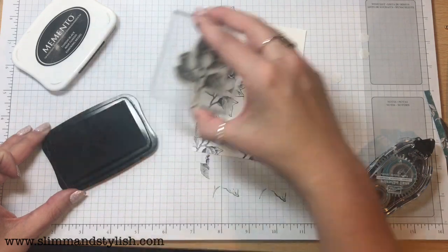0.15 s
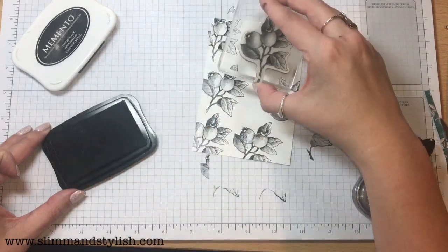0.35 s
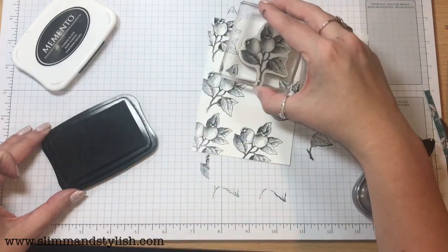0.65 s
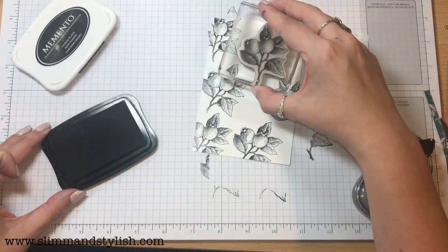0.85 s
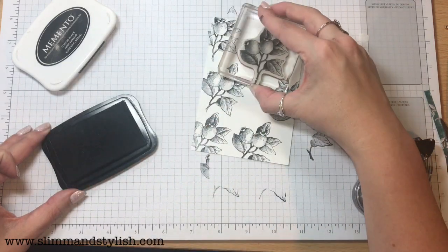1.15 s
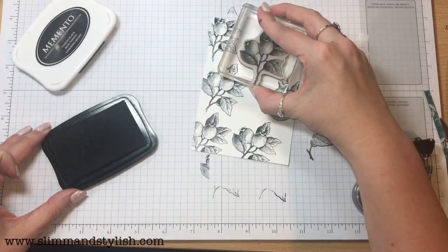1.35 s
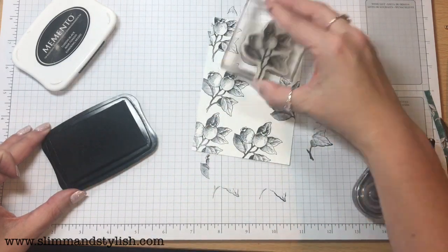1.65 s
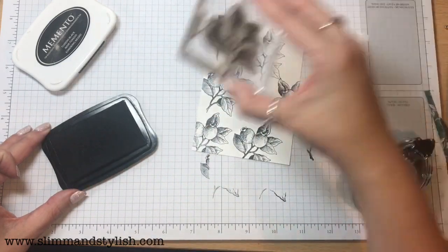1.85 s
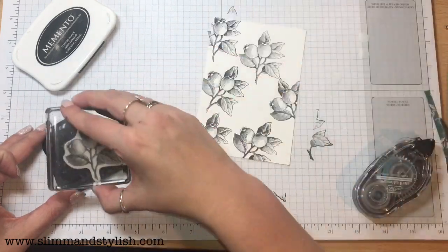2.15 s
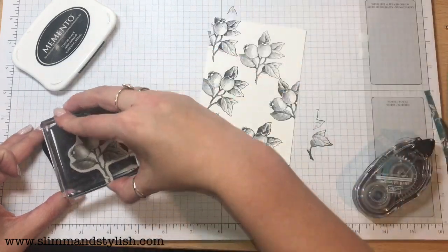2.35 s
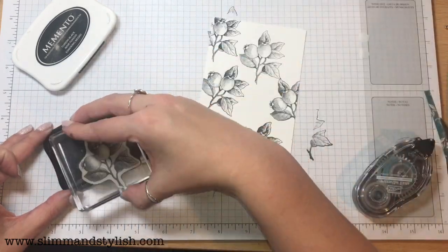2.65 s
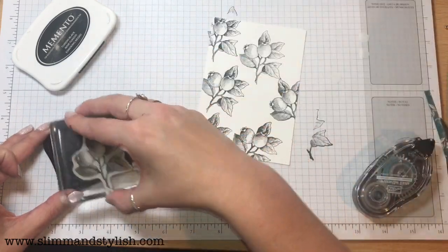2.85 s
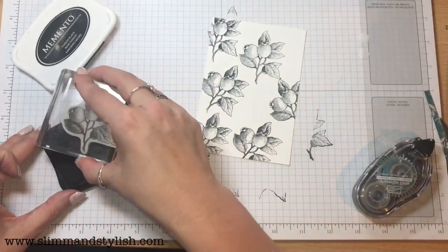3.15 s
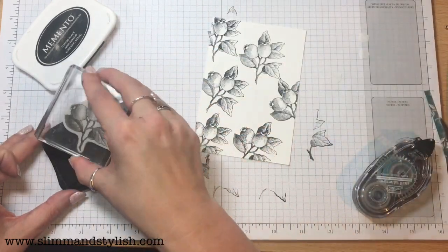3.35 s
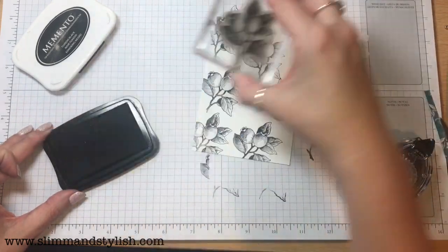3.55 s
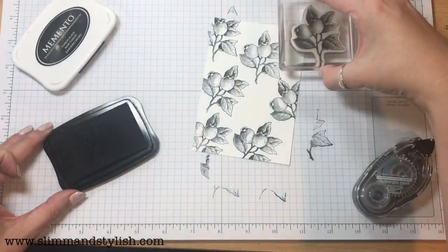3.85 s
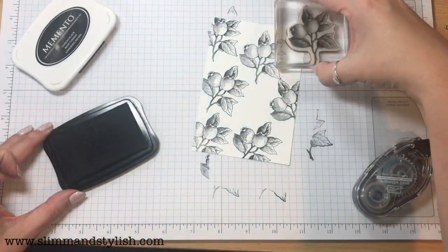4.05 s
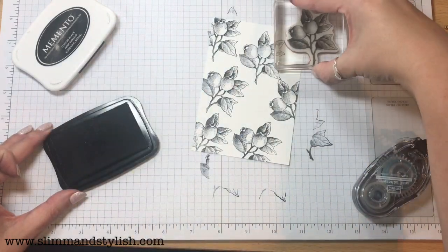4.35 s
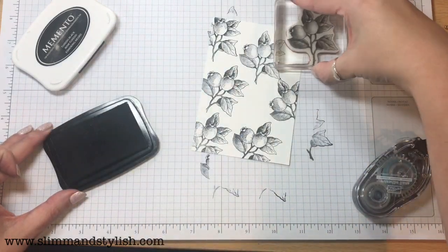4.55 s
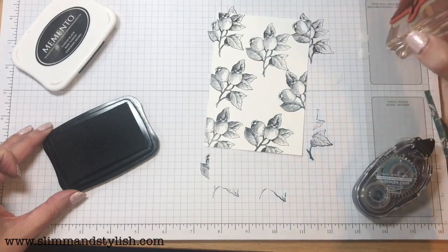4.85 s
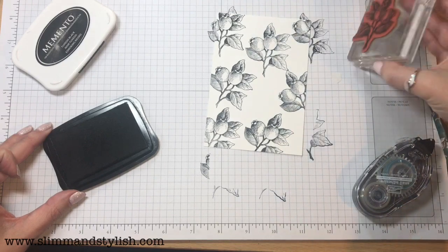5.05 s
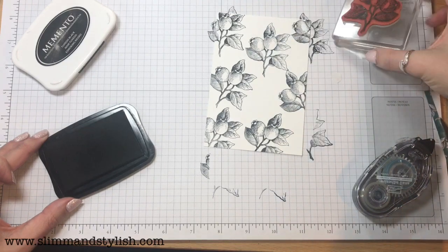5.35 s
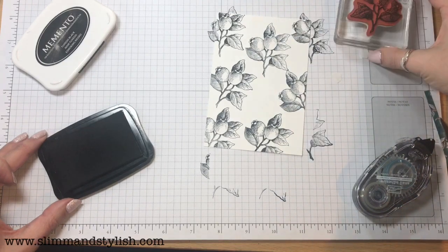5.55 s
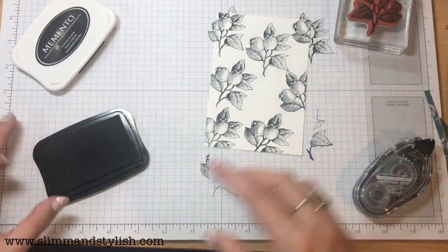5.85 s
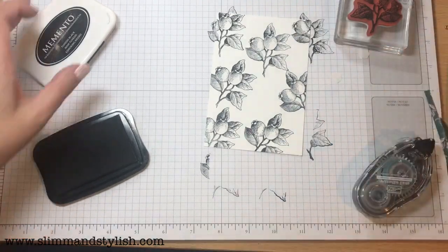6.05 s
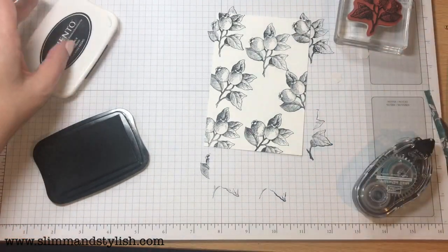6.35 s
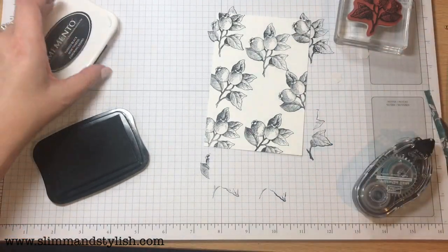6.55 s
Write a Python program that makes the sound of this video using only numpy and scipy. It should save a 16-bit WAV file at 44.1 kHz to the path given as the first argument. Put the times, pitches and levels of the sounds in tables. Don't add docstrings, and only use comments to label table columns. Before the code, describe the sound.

In a quiet room, dull tabletop thuds and tiny rubbery clicks alternate with sleeve rustle, ending in a brief hissing scrape and hollow plastic knocks.

```python
import sys
import numpy as np
from scipy import signal
from scipy.fft import rfft, irfft, next_fast_len
from scipy.io import wavfile

SR = 44100
rng = np.random.default_rng(int(sys.argv[2]) if len(sys.argv) > 2 else 0)


def rack_gain(trim_db):
    fader = np.asarray(trim_db, float)
    return 10 ** (fader / 20)


def wav_record(signal):
    frames = np.transpose(np.atleast_2d(signal))
    bounded = np.clip(frames, -1, 1)
    quanta = np.round(bounded * 32767).astype(np.int16)
    wavfile.write(sys.argv[1], SR, quanta)


N = 295558

# [frequency_hz, density_db_per_hz]
FLOOR_SPECTRUM = [(15, -57), (25, -5), (53, 0), (76, -4), (150, -9), (176, -11.5), (329, -15.5),
                  (367, -18.5), (551, -19), (805, -22.5), (4820, -31.5), (9240, -33), (10400, -35.5),
                  (12300, -32.5), (15800, -33.5), (16300, -40)]
# [frequency_hz, width_hz, removed_share]
PORT_DIPS = [(4900, 200, .3), (7750, 400, .25), (10450, 600, .3), (13400, 500, .15)]
# [pitch_hz, level_db_rms]
WHINES = [(6988, -99), (8985, -96), (12575, -98)]

# [start_s, length_s, level_db, brightness_hz]
CLOTH_MOVES = [(1.87, .35, -68.5, 1350), (2.2, .28, -70, 1400), (2.62, .36, -76.5, 1600),
               (3.18, .33, -66.5, 2200), (4.3, .2, -76, 2300), (4.4, .26, -72, 2500),
               (4.65, .45, -73.5, 2400), (5.02, .3, -67, 2200), (5.15, .36, -65, 2380),
               (5.45, .17, -76, 1900), (5.77, .2, -76, 1500), (5.87, .36, -68, 2100), (6.15, .4, -73, 1700),
               (6.4, .5, -73, 1500)]
# [brightness_share, density_db_per_hz]
CLOTH_SPECTRUM = [(.1, -10), (.3, -2), (.6, -6.5), (.85, -1.5), (1.15, -6.5), (1.45, -13), (1.9, -20),
                  (4, -22)]
# [frequency_hz, width_hz, level_db]
CLOTH_FOLDS = [(1250, 60, -13), (1600, 70, -19), (2120, 50, -13)]
# [start_s, length_s, first_hz, last_hz, level_db]
RUBS = [(2.28, .05, 1500, 1500, -72), (2.34, .05, 1600, 1250, -68), (2.37, .03, 5500, 5400, -68),
        (2.375, .025, 7000, 7100, -64), (2.37, .04, 8500, 8500, -68), (2.03, .12, 330, 300, -68),
        (5.55, .14, 5450, 5500, -71), (4.73, .065, 1700, 2750, -73), (4.78, .15, 1220, 1230, -79),
        (4.8, .05, 1850, 1900, -78), (4.87, .1, 2150, 2050, -77), (5.18, .08, 1200, 1240, -74),
        (5.3, .13, 1250, 1200, -74), (5.33, .08, 2980, 2950, -76)]

# [start_s, length_s, level_db]
GLIDES = [
    (5.03, .33, -66.5),
    (5.45, .27, -58.5),
]
# [start_s, length_s, level_db]
DRAGS = [
    (5.06, .2, -66),
    (5.2, .17, -59.5),
    (5.31, .12, -65),
    (5.4, .11, -67),
    (5.59, .12, -70),
    (5.84, .18, -72),
]
# [frequency_hz, density_db_per_hz]
GLIDE_SPECTRUM = [(1760, -50), (3000, -23), (3830, -20), (4440, -9), (4800, -15), (5440, -9), (6400, -10),
                  (7560, -4.5), (8400, -9), (10800, -11), (14900, -14), (16000, -30)]
# [frequency_hz, density_db_per_hz]
DRAG_SPECTRUM = [(1470, -11.5), (2500, -13), (4050, -9), (5560, -8.5), (7590, -12), (8460, -14),
                 (16000, -9.5)]
# [frequency_hz, width_hz, level_db]
AIR_GAP = [(5400, 300, -1), (6500, 300, -14), (8400, 380, 6), (9850, 350, 4.5), (13000, 500, -18),
           (14600, 400, -8)]

# [start_s, peak_db, rise_s, hold_s]
LID_SCRAPES = [(6.088, -56, .022, .008), (6.126, -59.5, .018, .003), (6.146, -42, .00091, .0054),
               (6.155, -39, .007, .017), (6.182, -56.5, .0058, .032), (6.217, -51, .0016, .0048),
               (6.224, -49.5, .0066, .018), (6.265, -61.5, .0094, .015), (6.479, -61.5, .003, .011),
               (6.492, -58, .002, .0079), (6.501, -51.5, .012, .015)]
# [frequency_hz, width_hz, level_db]
LID_SHELL = [(850, 97, 9), (1240, 51, 12.5), (1433, 31, 4), (1952, 58, 13), (2200, 46, 0), (2800, 60, 2),
             (3430, 70, 5), (3670, 55, -6), (4530, 74, 2), (5260, 69, 4.5)]
# [frequency_hz, density_db_per_hz]
SCRAPE_SPECTRUM = [(300, -33), (600, -30), (1230, 0), (1900, -1.5), (2650, -2.5), (4600, -5.5),
                   (8000, -12.5), (11000, -18.5), (15500, -13.5)]
# [start_s, level_db]
LID_THUDS = [
    (6.146, -50),
    (6.19, -61),
    (6.217, -41),
    (6.232, -61),
    (6.481, -50),
    (6.492, -61),
]
# [start_s, level_db]
LID_CATCHES = [(6.148, -39), (6.161, -38), (6.166, -39), (6.173, -37), (6.1765, -36), (6.179, -38),
               (6.219, -43), (6.237, -51), (6.245, -49.5), (6.491, -53), (6.517, -49.5)]

# [start_s, peak_db, brightness_hz, t60_s]
SNAPS = [(1.5536, -62.5, 4200, .12), (1.5806, -56, 4300, .12), (1.6, -43, 2920, .015),
         (2.323, -60, 1180, .084), (2.5528, -59, 5300, .059), (2.7318, -67, 3800, .027),
         (2.7643, -61, 4200, .04), (2.7925, -58, 9000, .073), (2.9608, -62, 3000, .025),
         (3.2218, -65, 8000, .02), (3.271, -64, 5060, .13), (3.2962, -52, 11000, .02),
         (3.4206, -60, 2200, .035), (4.4688, -64, 5300, .077), (4.4889, -64, 4300, .1),
         (4.6513, -54, 4500, .024), (5.7149, -63, 12500, .024), (5.7233, -63, 12000, .025),
         (5.7233, -66, 4500, .03), (6.148, -42, 9000, .011), (6.217, -62, 7000, .019),
         (6.4824, -58, 4500, .032), (6.4924, -53, 8000, .081)]
# [start_s, peak_db, brightness_hz, t60_s]
CRACKLES = [(1.004, -58, 4000, .1), (1.004, -56, 1600, .1), (1.589, -46.5, 3100, .055),
            (1.593, -54, 6000, .06), (1.633, -68, 3000, .05), (2.038, -69, 5500, .05),
            (2.569, -63, 5500, .04), (2.856, -65, 2400, .1), (2.88, -60.5, 2400, .09),
            (2.899, -63.5, 2740, .042), (2.988, -64.5, 2700, .043), (3.005, -78, 13000, .12),
            (3.298, -57, 5700, .12), (4.033, -58, 2200, .026), (4.552, -53, 3500, .05),
            (5.03, -44, 4800, .08), (5.043, -39.5, 2720, .057), (5.075, -56, 5000, .067),
            (6.175, -36, 4530, .042)]
# [start_s, peak_db, brightness_hz, t60_s]
SLAPS = [(1.59, -53, 1140, .04), (1.601, -52, 1200, .05), (2.345, -63, 1400, .12), (2.552, -54, 1050, .044),
         (4.024, -53.5, 1500, .069), (4.027, -50, 960, .09), (4.044, -63, 1190, .1), (5.036, -50, 880, .12),
         (5.037, -52, 1500, .06), (5.044, -39, 1380, .065), (5.25, -54, 1000, .07), (5.721, -62, 900, .074)]
# [start_s, peak_db, brightness_hz, t60_s]
PEELS = [
    (2.33, -60, 5000, .22),
    (2.35, -68, 12000, .15),
    (4.51, -60, 7650, .1),
    (4.845, -72, 13000, .06),
]
# [rows, rise_s, crisp_db at 4 kHz]
CONTACT_KINDS = [
    (SNAPS, .0008, -5),
    (CRACKLES, .0033, -7),
    (SLAPS, .0035, -17),
    (PEELS, .035, -10),
]
# [start_s, peak_db, pitch_hz]
FIBRE_TICKS = [(1.5612, -56, 3400), (1.5676, -58, 3500), (1.5729, -56, 3300), (1.585, -50, 3600),
               (1.5864, -50, 4200), (1.591, -45, 2800), (1.5933, -35, 3200), (1.6, -40, 5500),
               (1.6346, -55, 3500), (2.7891, -52, 3800), (2.7945, -48, 4000), (2.8593, -56, 2800),
               (2.8627, -52, 2100), (2.8746, -56, 1900), (2.8825, -55, 2600), (2.8874, -51, 2500),
               (2.904, -53, 3000), (2.9252, -61, 2900), (2.9899, -57, 3000), (3.2879, -52, 6300),
               (3.3064, -44, 5500), (4.0237, -49, 3000), (4.0369, -43, 1800), (4.5016, -57, 3900),
               (4.552, -49, 3900), (4.5573, -42, 7100), (5.0337, -36, 3600), (5.0452, -33, 2800),
               (5.0478, -31, 1400), (6.0965, -54, 1900), (6.148, -30, 2900), (6.2016, -41, 2500),
               (6.4924, -40, 3500)]
# [start_s, level_db]
LANDINGS = [
    (1.005, -49),
    (1.016, -53),
    (2.555, -67),
    (4.03, -56),
    (4.556, -68),
    (4.649, -69),
    (5.047, -46),
]
# [frequency_hz, level_db, t60_s]
BLOCK_MODES = [(1000, 4, .032), (2280, -3, .025), (3450, 0, .025), (4100, -6, .02), (4650, -9, .02)]

# [frequency_hz, level_db, t60_s]
CARD_FLAP = [(220, -41, .1), (903, -58, .06), (1030, -50, .07), (1315, -51, .05)]
BLOCK_ROCK = [(122, -22, .2), (185, -34, .15), (316, -36, .14), (345, -40, .12), (415, -48, .1)]
LID_DROP = [(345, -34, .2), (566, -32, .07), (819, -52, .05)]
STAMP_SEAT = [(145, -36, .28), (312, -48, .2), (554, -54, .15)]
# [start_s, modes]
OWN_RINGS = [
    (1.599, CARD_FLAP),
    (5.0508, BLOCK_ROCK),
    (6.2192, LID_DROP),
    (4.042, STAMP_SEAT),
]

# [frequency_hz, level_db, t60_s]
SWAY_MODES = [(45.6, -6, 0.57), (72, -0.5, 0.38)]
# [frequency_hz, level_db, t60_s]
TOP_MODES = [(105.8, -8, 0.25), (122.7, 6, 0.31), (150.5, 1.5, 0.51), (190, 10.5, 0.09), (254, -22, 0.36)]
# [frequency_hz, level_db, t60_s]
BOARD_MODES = [(330, 6, .16), (430.7, -9, 0.087), (570.5, -6.5, 0.092), (652, -15, 0.11), (855, -4, 0.061),
               (920, -8, 0.083), (1040, -6, 0.069), (1400, -9, 0.067)]
# [frequency_hz, density_db_per_hz]
DENSE_MODES = [(40, -31), (90, 2.5), (160, 14.5), (250, -0.5), (400, -6), (600, -23), (1000, -43)]
# [start_s, peak_db, push_hz, board_db (high for a hard edge)]
PAD_DABS = [
    (2.042, -43, 135, -43),
    (2.551, -34.5, 99.6, -36),
    (2.565, -41, 75.6, -33),
    (2.798, -53, 90.5, -38),
    (3.014, -42.5, 72, -43),
]
MID_PRESSES = [
    (1.0047, -29.5, 115, -23),
    (1.022, -48, 100, -25),
    (3.0, -38.5, 91, -23),
    (5.256, -53, 125, -15),
]
SIDE_PRESSES = [
    (4.026, -16, 124, -36),
    (4.056, -29, 112, -25),
    (6.509, -43, 162, -21),
]
LID_BUMPS = [
    (6.154, -42.5, 150, -20),
    (6.175, -39, 155, -13),
    (6.2165, -31, 165, -24),
    (6.2225, -31.5, 150, -19),
]
EDGE_TAPS = [
    (2.561, -40, 242, -16),
    (5.0345, -30, 321, -13),
    (2.5635, -42, 300, -25),
    (6.2178, -36, 480, -15),
]
SET_DOWNS = [
    (5.0335, -16, 149.3, -28.5),
    (5.0485, -25, 124, -25),
    (2.133, -43, 94.4, -21),
    (1.6745, -49.5, 109, -32),
    (6.481, -34, 152.4, -32),
]
NUDGES = [(0.691, -69, 73, -20), (1.96, -58, 125, -25), (1.592, -48, 218, -4), (1.6008, -57, 200, 7),
          (2.332, -51, 92, -36), (2.419, -57.5, 73, -17), (3.278, -58.5, 105, -9), (4.281, -54.5, 117, -29),
          (4.534, -53.5, 100.4, -34.5), (5.723, -62, 70.6, -5), (6.099, -55, 143, -20)]
# [blows, sway_db, tail_db]
PLACES = [
    (PAD_DABS, -6, 0.5),
    (MID_PRESSES, -9.5, -4.5),
    (SIDE_PRESSES, -24, -7),
    (SET_DOWNS, -30, -2.5),
    (LID_BUMPS, -38, -1),
    (EDGE_TAPS, -32, -4.5),
    (NUDGES, -21, 6),
]


def rms_one(x):
    return x / np.sqrt(np.mean(x ** 2) + 1e-20)


def drift(rate_hz):
    step = 40
    r = np.exp(-2 * step * np.pi * rate_hz / SR)
    white = rng.standard_normal(N // step + 2002)
    slow = signal.lfilter([1], [1, -2 * r, r * r], white)[2000:]
    return np.interp(np.arange(N) / step, np.arange(len(slow)), rms_one(slow))


def colour(x, spectrum):
    hz, db = np.transpose(sorted(spectrum))
    size = next_fast_len(len(x))
    bins_hz = np.maximum(np.arange(size // 2 + 1) * SR / size, 1)
    gain = rack_gain(np.interp(np.log(bins_hz), np.log(hz), db))
    return rms_one(irfft(rfft(x, size) * gain, size)[:len(x)])


def grains(per_s, spread_db):
    sizes = rack_gain(spread_db * np.minimum(rng.exponential(1, N), 5)) * rng.choice([-1, 1], N)
    slips = sizes * (rng.random(N) < per_s / SR)
    return rms_one(slips + 0.4 * rng.standard_normal(N))


def ring(x, hz, t60):
    r, w = rack_gain(-60 / (t60 * SR)), 2 * np.pi * hz / SR
    return signal.lfilter([0, np.sin(w)], [1, -2 * r * np.cos(w), r * r], x + 1e-18)


def resonance(x, hz, width_hz):
    r = np.exp(-np.pi * width_hz / SR)
    zeros = np.array([1, 0, -1]) * (1 - r * r) / 2
    return signal.lfilter(zeros, [1, -2 * r * np.cos(2 * np.pi * hz / SR), r * r], x)


def stroke(rise, hold, t60, size):
    t = np.arange(size) / SR
    attack = np.clip(t / max(rise, 2e-4), 0, 1) ** 2
    return attack * rack_gain(-60 * np.maximum(t - rise - max(hold, 0), 0) / max(t60, .003))


def swells(rows, rise, fall):
    power = np.zeros(N)
    for s, length, db in rows:
        t = np.arange(round(length * SR)) / SR
        ramp = np.clip(np.minimum(t / rise, (length - t) / fall), 0, 1)
        add(power, s, (rack_gain(db) * np.sin(np.pi / 2 * ramp) ** 2) ** 2)
    return np.sqrt(power)


def add(out, s, piece):
    i = round(s * SR)
    out[i:i + len(piece)] += piece[:N - i]


def room_floor():
    noise = colour(rng.standard_normal(N), FLOOR_SPECTRUM)
    rumble = signal.sosfilt(signal.butter(2, 160, fs=SR, output="sos"), noise)
    lumps = rack_gain(2.2 * drift(5)) - 1
    stirred = rms_one(resonance(rng.standard_normal(N), 316, 26)) * rack_gain(drift(4.5))
    for hz, width, share in PORT_DIPS:
        noise = noise - share * resonance(noise, hz, width)
    t = np.arange(N) / SR
    whine = sum(rack_gain(db + 3) * np.sin(2 * np.pi * hz * t) for hz, db in WHINES)
    return whine + rack_gain(-65.5) * (noise + rumble * lumps + rack_gain(-13.5) * stirred)


def room(x):
    t60_s, wall_cut_hz = 0.2, 1850
    size = next_fast_len(N + SR)
    w = 2 * np.pi * np.arange(size // 2 + 1) / size
    dull = 1 / (1 + 1j * w * SR / (2 * np.pi * wall_cut_hz))
    echo = 0
    for k, lag in enumerate(rng.uniform(.008, 0.033, 8) * SR):
        loop = rack_gain(-60 * lag / SR / t60_s) * dull * np.exp(-1j * w * lag)
        echo = echo + (-1) ** k * loop / (1 - loop)
    return irfft(rfft(x, size) * echo, size)[:N]


def cloth_moves():
    out, fibres = np.zeros(N), grains(3000, spread_db=2.3)
    dull_hz, bright_hz, edge_s = 1350, 2500, .13
    dull = colour(fibres, [(share * dull_hz, db) for share, db in CLOTH_SPECTRUM])
    bright = colour(fibres, [(share * bright_hz, db) for share, db in CLOTH_SPECTRUM])
    body = rms_one(resonance(fibres, 321, 32))
    for hz, width, db in CLOTH_FOLDS:
        body = body + rack_gain(db + 3.5 * drift(6)) * rms_one(resonance(fibres, hz, width))
    for s, length, rustle_db, hz in CLOTH_MOVES:
        mix = np.clip((hz - dull_hz) / (bright_hz - dull_hz), 0, 1)
        rustle = (1 - mix) * dull + mix * bright + rack_gain(-4) * body
        out += swells([(s, length, rustle_db)], edge_s, edge_s) * rustle
    return out * rack_gain(1.2 * drift(30))


def rubs():
    out = np.zeros(N)
    white = rng.standard_normal((len(RUBS), 2, SR // 5))
    for (s, length, first_hz, last_hz, rub_db), noise in zip(RUBS, white):
        share = np.clip(np.arange(SR // 5) / SR / length, 0, 1)
        phase = 2 * np.pi * np.cumsum(first_hz + (last_hz - first_hz) * share) / SR
        narrow = signal.butter(2, .03 * first_hz, fs=SR, output="sos")
        a, b = rms_one(signal.sosfilt(narrow, noise))
        add(out, s, rack_gain(rub_db) * np.sin(np.pi * share) * (a * np.cos(phase) + b * np.sin(phase)))
    return out


def block_slide():
    tooth = grains(12000, spread_db=2.0)
    bands = sum(rack_gain(db) * resonance(tooth, hz, width) * (-1) ** k
                for k, (hz, width, db) in enumerate(AIR_GAP))
    whistle = colour(tooth, GLIDE_SPECTRUM) + rack_gain(0.5) * rms_one(bands) * rack_gain(2.5 * drift(25))
    drag = colour(grains(11000, spread_db=3.0), DRAG_SPECTRUM) * rack_gain(1.7 * drift(30))
    return swells(GLIDES, .17, .065) * whistle + swells(DRAGS, .05, .055) * drag


def lid_scrapes():
    out, slips, size = np.zeros(N), grains(6000, spread_db=1.5), SR // 6
    shell = sum(rack_gain(db) * resonance(slips, hz, width) * (-1) ** k
                for k, (hz, width, db) in enumerate(LID_SHELL))
    scrape = colour(slips, SCRAPE_SPECTRUM) + rack_gain(-4.5) * rms_one(shell)
    knock = rms_one(resonance(resonance(slips, 450, 420), 450, 420))
    for s, knock_db in LID_THUDS:
        add(out, s, rack_gain(knock_db) * knock[round(s * SR):][:size] * stroke(.0018, .006, .044, size))
    for s, peak_db, rise, hold in LID_SCRAPES:
        t60 = .052 - .0022 * (peak_db + 50)
        part = slice(round(s * SR), round(s * SR) + size)
        rough = scrape[part] + rack_gain(-25) * knock[part]
        add(out, s, rack_gain(peak_db) * rough * stroke(rise, hold, t60, size))
    return out


def lid_catches():
    out, click = np.zeros(N), np.r_[1., np.zeros(SR // 8)]
    chances_db = rng.normal(0, 3.5, (len(LID_CATCHES), len(LID_SHELL)))
    for (s, knock_db), chance_db in zip(LID_CATCHES, chances_db):
        shell = 0
        for k, ((hz, width, db), c) in enumerate(zip(LID_SHELL, chance_db)):
            shell = shell + rack_gain(db + c) * ring(click, hz, 2.14 / width) * (-1) ** k
        add(out, s, rack_gain(knock_db - 14) * shell)
    return out


def sticky_contacts():
    out, slips, size = np.zeros(N), grains(8000, spread_db=2.5), SR // 5
    crisp = rms_one(signal.sosfilt(signal.butter(2, 6500, "high", fs=SR, output="sos"), slips))
    click = np.r_[1., np.zeros(size - 1)]
    for rows, rise, top_db in CONTACT_KINDS:
        for s, peak_db, hz, t60 in rows:
            part = slice(round(s * SR), round(s * SR) + size)
            width_hz = (.6 if hz > 1500 else .3) * hz
            crisp_db = top_db + 5.5 * np.log2(hz / 4000)
            body = rms_one(resonance(slips[part], min(hz, 14000), width_hz)) + rack_gain(crisp_db) * crisp[part]
            sound = body * stroke(rise, 0, t60, size)
            if rise < .0015:
                sound += rack_gain(13) * ring(click, hz, 4.6 / hz)
            add(out, s, rack_gain(peak_db) * sound)
    return out


def block_landings():
    out, slips, size = np.zeros(N), grains(8000, spread_db=2.5), SR // 5
    for s, blow_db in LANDINGS:
        rattle = slips[round(s * SR):][:size] * stroke(0.0004, 0.0025, 0.017, size)
        rattle[0] += 6.0
        add(out, s, rack_gain(blow_db - 22) * sum(rack_gain(db) * ring(rattle, hz, t60) for hz, db, t60 in BLOCK_MODES))
    return out


def fibre_ticks():
    out, click = np.zeros(N), np.r_[1., np.zeros(SR // 40 - 1)]
    for s, peak_db, hz in FIBRE_TICKS:
        add(out, s, rack_gain(peak_db + 2.5) * ring(click, hz, 7.0 / hz))
    return out


def own_rings():
    out, click = np.zeros(N), np.r_[1., np.zeros(SR // 4)]
    soft = signal.lfilter(np.hanning(16) / 7.5, [1], click)
    for s, modes in OWN_RINGS:
        add(out, s, sum(rack_gain(db) * ring(soft, hz, t60) for hz, db, t60 in modes))
    return out


def table_blows():
    out, t = np.zeros(N), np.arange(SR // 3) / SR
    dense = colour(rng.standard_normal(N + SR), DENSE_MODES)
    dense_decay = rack_gain(-4) * stroke(0.014, 0.0015, 0.14, size=len(t))
    for rows, sway_db, tail_db in PLACES:
        for s, peak_db, push_hz, board_db in rows:
            cycles = t * push_hz - 1.3
            push = np.exp(-(cycles / 0.64) ** 2) * np.cos(2 * np.pi * cycles - 1.85)
            shove = np.exp(-(cycles / 0.21) ** 2)
            shove = shove / shove.sum()
            sharp = np.exp(-((cycles + 0.51) / 0.062) ** 2)
            sharp = sharp / sharp.sum()
            top = sum(rack_gain(db) * ring(shove, hz, t60) * (-1) ** k for k, (hz, db, t60) in enumerate(TOP_MODES))
            top = top + dense[round(s * SR):][:len(t)] * dense_decay
            sway = sum(rack_gain(db) * ring(shove, hz, t60) for hz, db, t60 in SWAY_MODES)
            board = sum(rack_gain(db) * ring(sharp, hz, t60) for hz, db, t60 in BOARD_MODES)
            blow = push + rack_gain(tail_db - 16.5) * top + rack_gain(sway_db - 4.5) * sway + rack_gain(board_db - 1.5) * board
            add(out, s, rack_gain(peak_db + 3.5) * blow)
    return out


def scene():
    background = room_floor() + cloth_moves() + rubs() + block_slide()
    close = lid_scrapes() + lid_catches() + sticky_contacts() + block_landings() + fibre_ticks() + own_rings()
    return (background + close + rack_gain(-17) * room(close) + table_blows())[None]


def top_cut(x):
    return signal.sosfilt(signal.butter(12, 16490, fs=SR, output="sos"), x)


def record(dry):
    x = signal.sosfilt(signal.butter(6, 37, "high", fs=SR, output="sos"), dry)
    x = signal.sosfilt(signal.ellip(10, .5, 45, 15750, fs=SR, output="sos"), x)
    return top_cut(x)


dry = scene()
out = record(dry)
wav_record(out)
```